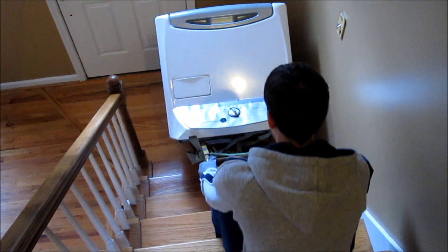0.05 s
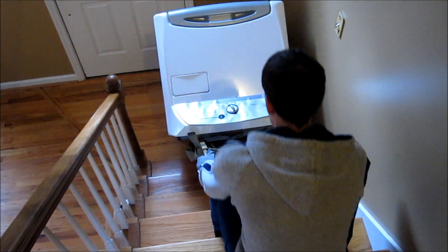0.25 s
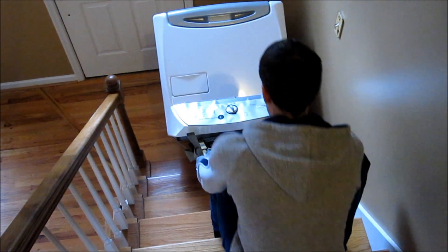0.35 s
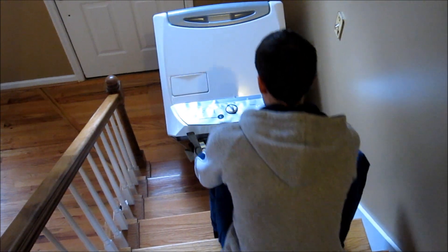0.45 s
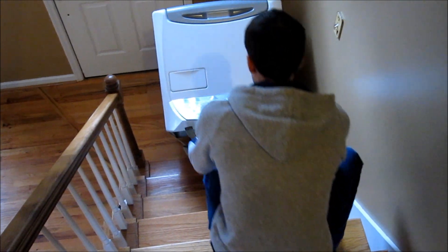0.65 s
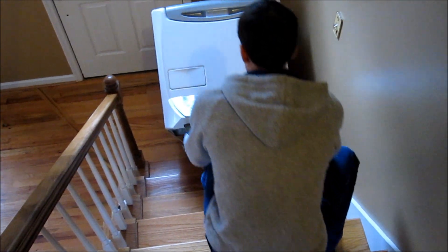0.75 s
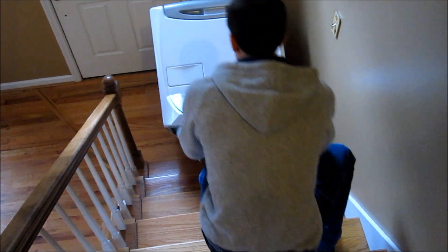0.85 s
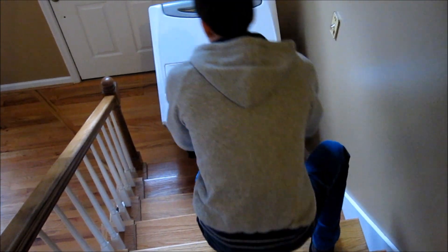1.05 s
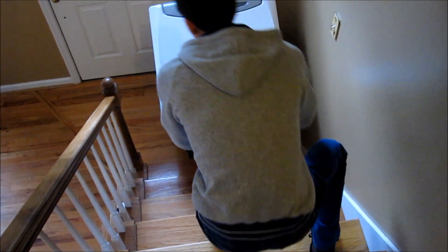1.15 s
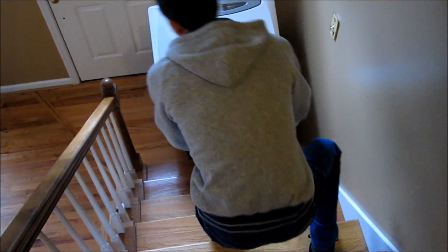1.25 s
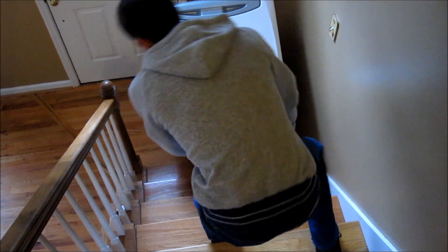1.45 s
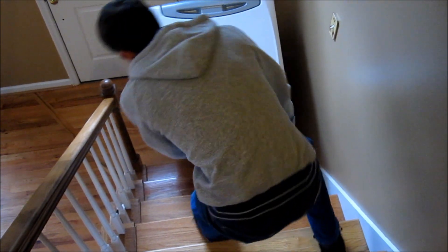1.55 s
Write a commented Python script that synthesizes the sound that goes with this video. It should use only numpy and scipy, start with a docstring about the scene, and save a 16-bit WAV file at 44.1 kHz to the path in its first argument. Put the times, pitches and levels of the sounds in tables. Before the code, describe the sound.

A heavy appliance thumps down one wooden stair after a short scrape, its metal panels clanging and loose parts rattling. The ringing fades in an indoor stairwell, leaving light ticks, soft steps and rustling clothes over faint room noise.

```python
"""A washing machine on the stairs

A washing machine slides over the edge of a wooden step and drops onto the next. The stair booms, the
steel cabinet clangs and rocks, loose parts rattle, and the hard stairwell rings on. Light ticks and
soft footsteps follow. Clothes rustle over faint room noise and the thin whine of a motor."""
import sys
import numpy as np
from scipy import signal
from scipy.fft import rfft, irfft
from scipy.io import wavfile

SR = 44100
rng = np.random.default_rng(int(sys.argv[2]) if len(sys.argv) > 2 else 0)


def pcm_store(signal):
    """Save signal as 16-bit PCM."""
    levels = np.round(np.clip(np.atleast_2d(signal), -1, 1) * 32767)
    wavfile.write(sys.argv[1], SR, levels.astype(np.int16).T)


N = 70560
T = np.arange(N) / SR

# The cabinet lands and rocks. Each row: start in seconds, then thud, clang and crack levels in dB.
BLOWS = [(0.2060, -48, -29, -34.5), (0.2086, -19.5, -32.5, -24), (0.2118, -62, -21.5, -21),
         (0.2310, -60, -24, -33), (0.2443, -20, -20.5, -30.5), (0.2785, -24, -37.5, -32.5),
         (0.3120, -57, -21.5, -45), (0.3400, -36, -34.5, -58), (0.3960, -48, -34, -50),
         (0.6550, -51, -38.5, -60), (0.7280, -64, -37, -49)]


def from_db(db):
    """Turn decibels into a number to multiply by."""
    return 10 ** (np.asarray(db) / 20)


def unit_level(x):
    """Scale a sound so that its average level (rms) is 1."""
    return x / np.sqrt(np.mean(x ** 2) + 1e-20)


def level_curve(rows):
    """A gain that glides between points of time and level."""
    return from_db(np.interp(T, *np.transpose(rows)))


def clicks(times, db):
    """One sharp push for each contact, at times given in seconds."""
    out = np.zeros(N)
    samples = np.clip(np.round(times * SR).astype(int), 0, N - 1)
    np.add.at(out, samples, from_db(db))
    return out


def tiny_contacts(per_s, spread_db):
    """Tiny pushes of uneven size at random times."""
    sizes = from_db(spread_db * np.minimum(rng.exponential(1, N), 3))
    signs = rng.choice([-1, 1], N)
    return unit_level(sizes * signs * (rng.random(N) < per_s / SR))


def shape_tone(x, spectrum):
    """Make some pitches stronger and others weaker."""
    hz, db = np.transpose(spectrum)
    log_hz = np.log(np.arange(N + 1) * SR / (2 * N) + 1)
    bass_cut_db = 20 * np.maximum(np.log(hz[0]) - log_hz, 0)
    gain = from_db(np.interp(log_hz, np.log(hz), db) - bass_cut_db)
    return unit_level(irfft(rfft(x, 2 * N) * gain)[:N])


def ring_level(force, ring_s, swell_s):
    """Each push adds energy that builds up and drains away. The ring time is how long a 60 dB fade takes."""
    keep = from_db(-120 / (max(ring_s, .005) * SR))
    lag = np.exp(-2 / (swell_s * SR))
    energy = signal.lfilter([1], [1, -keep], force ** 2 + 1e-18)
    swelling = signal.lfilter([(1 - lag) ** 2], [1, -2 * lag, lag ** 2], energy)
    return np.sqrt(np.abs(swelling))


def band_noise(table, force=None):
    """Noise in narrow bands. Given a force, each band rings and fades like many close tones."""
    hz, db, *ring_s = np.transpose(table)
    edges_hz = 22 * 2 ** (np.arange(39) / 4)   # four bands to an octave
    white = rng.standard_normal((2, N + SR // 4))
    out, power = 0, 0
    for k, (low, high) in enumerate(zip(edges_hz, edges_hz[1:])):
        centre = np.log(low * high) / 2
        outside = max(np.log(hz[0]) - centre, centre - np.log(hz[-1]), 0)
        if outside > 1:   # too far beyond the table's pitches
            continue
        gain = from_db(np.interp(centre, np.log(hz), db) - 20 * outside)
        bandpass = signal.butter(2, [low, high], "band", fs=SR, output="sos")
        band = signal.sosfilt(bandpass, white[k % 2])[-N:]
        if force is not None:
            band *= ring_level(force, np.interp(centre, np.log(hz), ring_s[0]), swell_s=0.6 / low)
        out += gain * band
        power += gain ** 2 * (high - low) * 2 / SR
    return out / np.sqrt(power)


def struck_tones(force, table, rise_s):
    """A body's own tones swell as a blow spreads through it, then fade."""
    tones = sum(from_db(db - 60 * T / ring_s) * np.sin(2 * np.pi * hz * T) for hz, db, ring_s in table)
    swell = 1 - np.exp(-T / rise_s)
    return signal.fftconvolve(force, tones * swell)[:N]


def house():
    """Steady room noise, with the low hum and wavering whine of a motor somewhere in the house."""
    # Each row: pitch in Hz, relative strength in dB.
    room = [(15, -38), (25, -4), (69, -7.5), (107, -7.5), (152, -0.5), (227, -4), (331, -2), (368, -3),
            (970, -8.5), (1110, -5.5), (1750, -12.5), (1900, -10), (3000, -16.5), (10900, -28.5),
            (15500, -37)]
    # Each row: pitch in Hz, level in dB, width in Hz.
    motor_tones = [(67, -60, 4.6), (1850, -64, 3), (1915, -61, 3), (2450, -66.5, 5), (2530, -64.5, 3.5),
                   (3090, -71, 23)]
    out = from_db(-46.5) * band_noise(room)
    for hz, db, width_hz in motor_tones:
        narrow_filter = signal.iirpeak(hz, hz / width_hz, fs=SR)
        tone = signal.lfilter(*narrow_filter, rng.standard_normal(N + SR))[SR:]
        out += from_db(db) * unit_level(tone)
    return out


def clothes():
    """Cloth rubs on cloth as the person carrying the machine shifts."""
    # Each row: time in seconds, level in dB.
    loudness = [(0, -59), (.8, -59.5), (1.0, -60), (1.09, -58.5), (1.14, -52), (1.2, -56.5), (1.35, -58.5),
                (1.47, -56.5), (1.55, -52.5), (1.6, -47.5)]
    # Each row: pitch in Hz, relative strength in dB.
    spectrum = [(400, -3), (1500, 1), (3400, 0.5), (6000, -5.5), (9000, -6), (15500, -13.5)]
    rubs = tiny_contacts(per_s=3300, spread_db=1.0)
    return level_curve(loudness) * shape_tone(rubs, spectrum)


def footsteps():
    """Feet land softly on the stairs, then a step bends under the person's weight."""
    # Each row: start in seconds, level in dB.
    footfalls = [(0.934, -48), (0.959, -35.5), (0.973, -53), (1.006, -44), (1.378, -53), (1.434, -54)]
    # Each row: pitch in Hz, relative strength in dB, ring time in seconds.
    wood_ring = [(60, -24, .3), (106, -3, 0.27), (147, -3.5, 0.38), (305, -0.5, 0.25), (540, -5, 0.49),
                 (1100, -9.5, 0.38), (1800, -21, 0.83), (4500, -27, .25), (12000, -47, .2)]
    steps = band_noise(wood_ring, clicks(*np.transpose(footfalls)))
    weight = clicks(np.array([1.568]), db=-40)
    return steps + struck_tones(weight, [(64, 0, .1)], rise_s=0.006)   # one short 64 Hz tone


def fittings():
    """Small fittings knock and give bright ticks."""
    # Each row: start in seconds, level in dB.
    ticks = [(0.072, -43), (0.2935, -37), (0.301, -34.5), (0.728, -49.5), (0.755, -51), (0.960, -54.5)]
    # Each row: pitch in Hz, relative strength in dB, ring time in seconds.
    tick_ring = [(2000, 5.5, 0.28), (5000, 5, 0.25), (7500, 3, 0.27), (11000, -5.5, 0.19),
                 (15500, -15, 0.11)]
    return band_noise(tick_ring, clicks(*np.transpose(ticks)))


def slide():
    """The cabinet scrapes over the step's edge in many tiny slips until it drops."""
    # Each row: time in seconds, level in dB.
    loudness = [(0, -35), (.09, -37), (.17, -38.5), (.205, -36), (.3, -65), (.45, -90)]
    # Each row: pitch in Hz, relative strength in dB.
    spectrum = [(59, -52), (100, -27), (129, -17), (213, -0.5), (252, -14), (285, 3.5), (425, -9),
                (482, -4.5), (535, -5.5), (923, -2), (1700, -9), (2520, -4), (4180, -12), (7350, -21.5),
                (15000, -38.5)]
    slips = tiny_contacts(per_s=2500, spread_db=0.5)
    return level_curve(loudness) * shape_tone(slips, spectrum)


def rattle():
    """Loose parts chatter after the landing and settle."""
    # Each row: pitch in Hz, relative strength in dB, ring time in seconds.
    parts_ring = [(390, 14, 0.15), (1200, 1, 0.04), (3000, -14, 0.047), (5000, -0.5, 0.051),
                  (9000, -28, 0.036), (15500, -30, .02)]
    hits_per_s, settle_s = 190, 0.44
    since = T - BLOWS[2][0]   # starts at the third blow
    settling = (since > 0) * from_db(-60 * np.abs(since) / settle_s)
    hits = tiny_contacts(hits_per_s, spread_db=6) * np.sqrt(hits_per_s / SR)
    return from_db(-22.5) * band_noise(parts_ring, hits * settling)


def stair_boom(force):
    """The wooden stair booms under the blows, with a wash of noise and a few low tones."""
    # Each row in both: pitch in Hz, relative strength in dB, ring time in seconds.
    wash = [(30, -6, .4), (58, -2, 0.46), (96, -23, 0.38), (122, -25, 0.36), (153, -3.5, 0.55),
            (203, -5.5, 0.81), (258, -4, 0.52), (350, 1.5, 0.22), (455, -8.5, 0.91), (890, -37, 0.41)]
    tones = [(56, -2.5, 0.091), (65.8, -13.5, 0.66), (141.6, -22.5, 0.65), (148.8, -7, 0.63),
             (182, 7, 0.16), (205.7, 6.5, 0.14), (217.7, -11, 0.6), (287, -2, 0.19)]
    return from_db(-6.5) * band_noise(wash, force) + struck_tones(force, tones, rise_s=0.006)


def panel_clang(force):
    """The steel panels clang, with clear tones over a wash of noise that rings in the stairwell."""
    # Each row in both: pitch in Hz, relative strength in dB, ring time in seconds.
    wash = [(148, -20.5, 2.15), (308, -7, 1.11), (488, 4.5, 0.91), (760, -8, 1.52), (1130, -1.5, 1.18),
            (1510, -14.5, 1.35), (2720, -21.5, 1.4), (5930, -40, .7)]
    tones = [(389.8, -11.5, 0.66), (491.6, -9.5, 1.27), (633, -30, 1.1), (669, -24, 0.75), (880, -21, 0.91),
             (1020, -41, 0.84), (1027, -24, 1.3), (1176, -32, 1.3), (2760, -25, 0.72), (2852, -46, .9),
             (3466, -39, 0.56), (3930, -25, 0.74), (4119, -25, 1.45)]
    return from_db(-0.5) * band_noise(wash, force) + struck_tones(force, tones, rise_s=0.007)


def edge_crack(force):
    """The hard bottom edge hits: a short, direct snap stands out over the stairwell's ringing."""
    # Each row: pitch in Hz, relative strength in dB, ring time in seconds.
    edge_ring = [(590, 0, 0.91), (1620, -4, 1.34), (3020, 0, 0.98), (3660, -4, 1.09), (4330, -1, 0.82),
                 (5420, -9.5, 0.95), (8000, -11, 0.57), (10350, -23, 0.62), (15500, -38, .5)]
    snap_s = .04
    snap = band_noise([(hz, db, snap_s) for hz, db, _ in edge_ring], force)
    return from_db(2.5) * snap + from_db(-1) * band_noise(edge_ring, force)


def landing():
    """Each blow shakes the stair, the panels and the bottom edge together."""
    starts, *levels = np.transpose(BLOWS)
    thud, clang, crack = (clicks(starts, db) for db in levels)
    return stair_boom(thud) + panel_clang(clang) + edge_crack(crack)


def scene():
    """Add all the sounds into one channel."""
    return (landing() + rattle() + fittings() + footsteps() + slide() + clothes() + house())[None]


def record(dry):
    """Cut away the very highest treble."""
    cutoff_hz = 15750
    return signal.sosfilt(signal.ellip(12, .1, 80, cutoff_hz, fs=SR, output="sos"), dry)


dry = scene()
out = record(dry)
pcm_store(out)
```